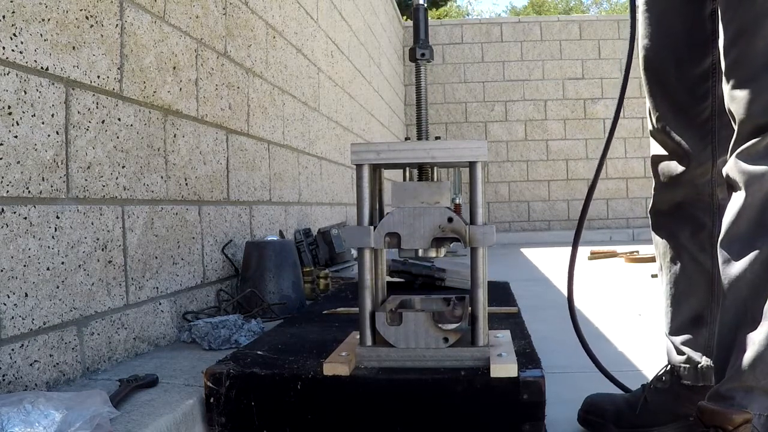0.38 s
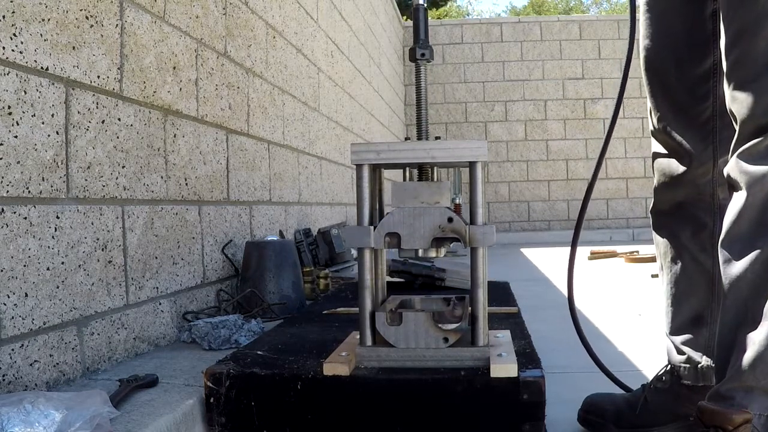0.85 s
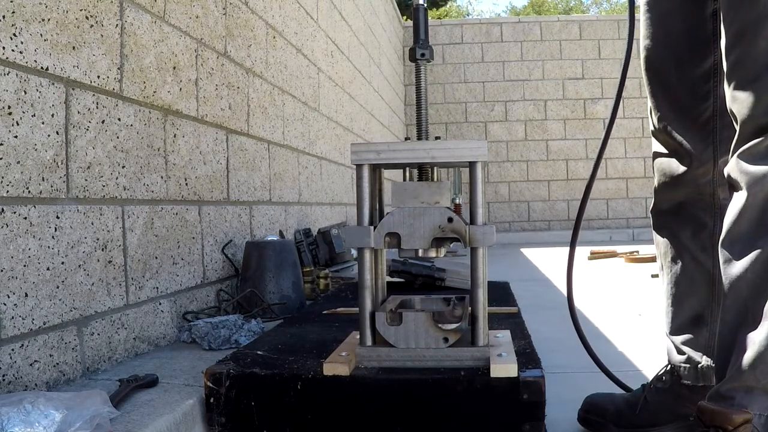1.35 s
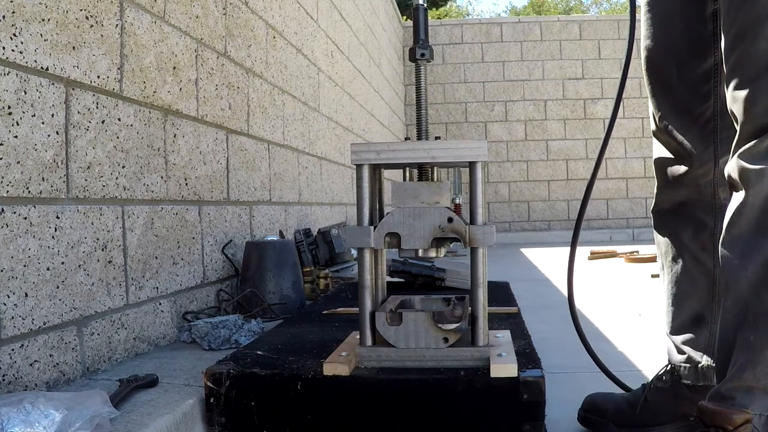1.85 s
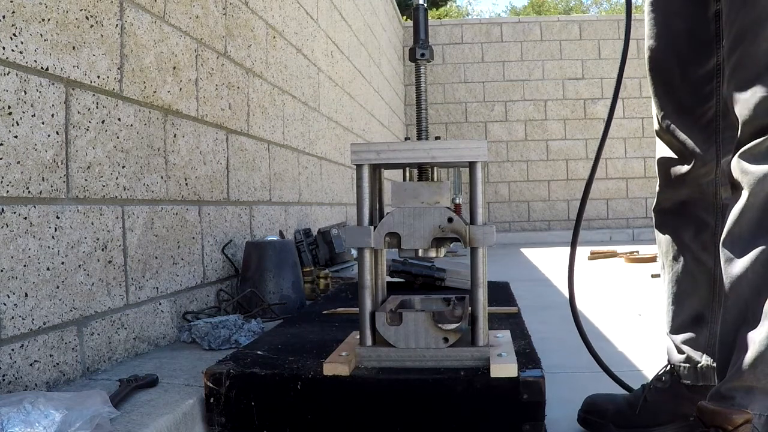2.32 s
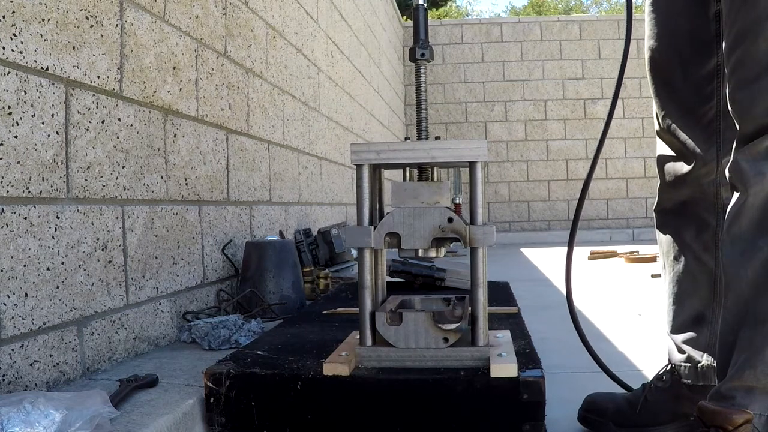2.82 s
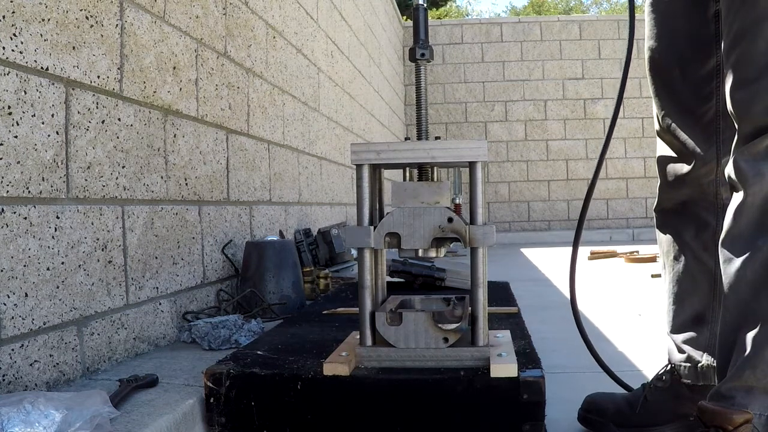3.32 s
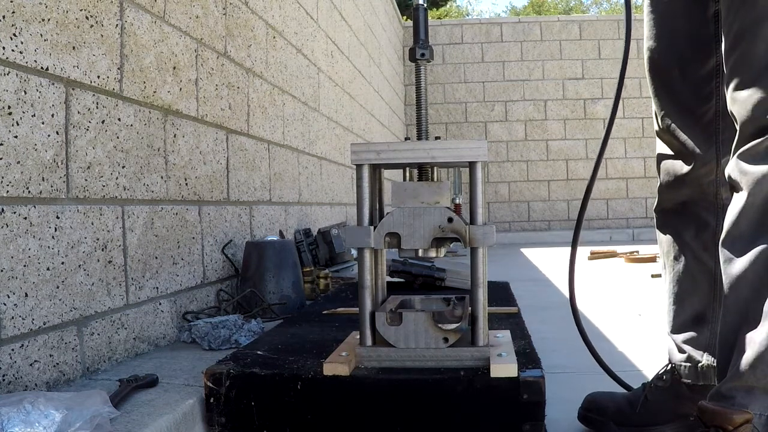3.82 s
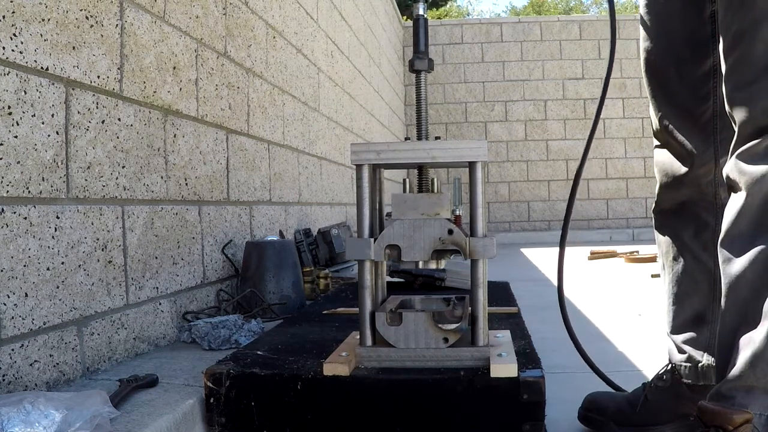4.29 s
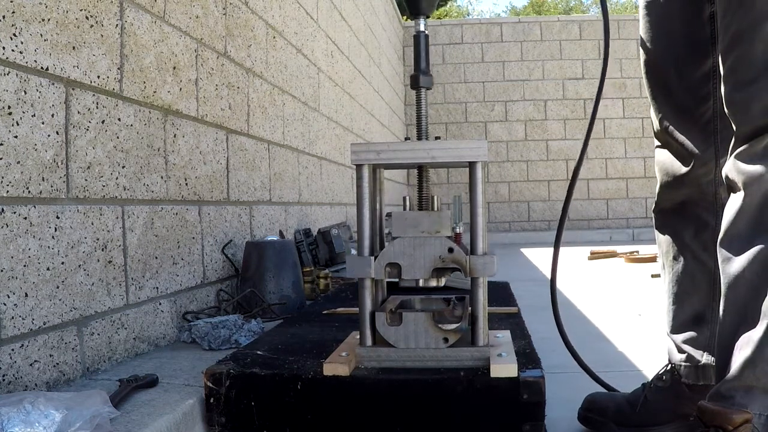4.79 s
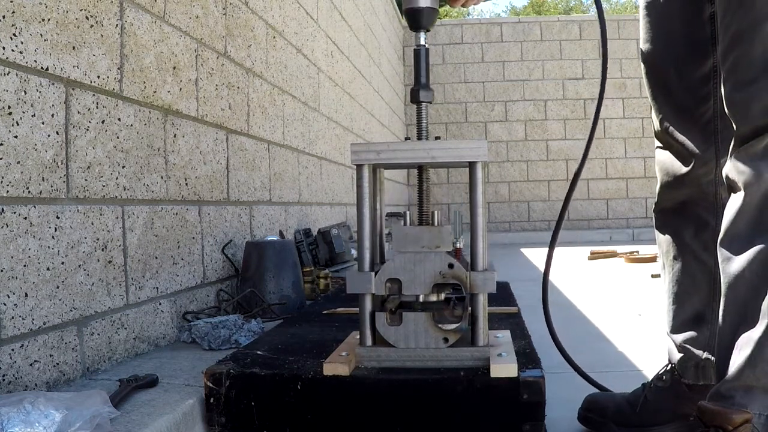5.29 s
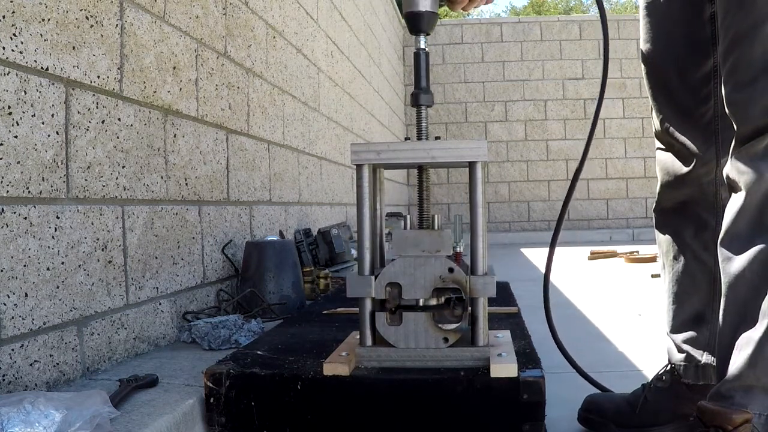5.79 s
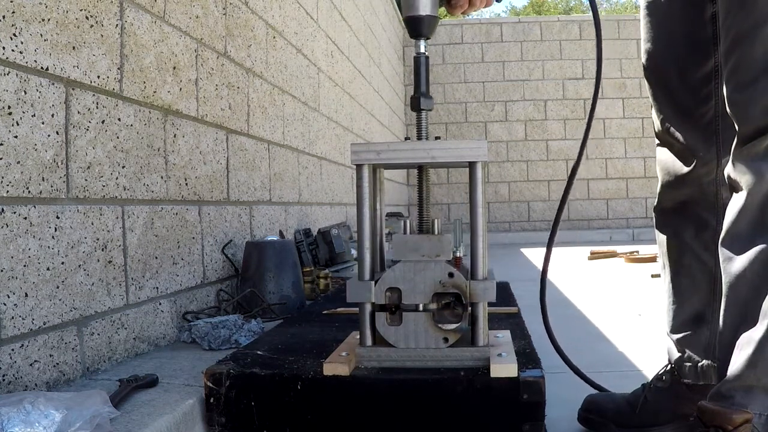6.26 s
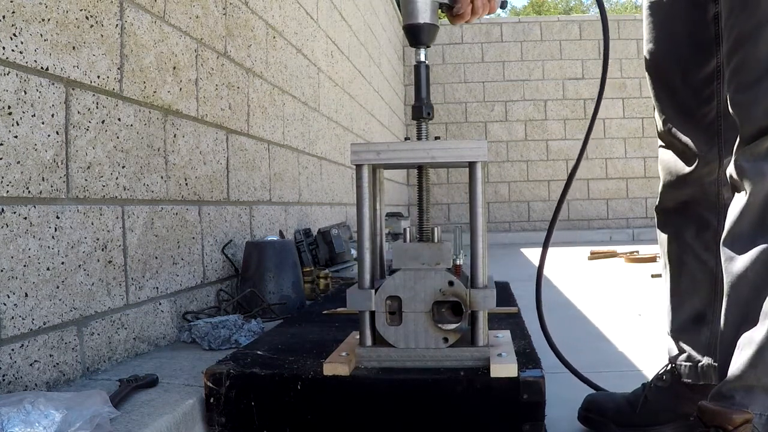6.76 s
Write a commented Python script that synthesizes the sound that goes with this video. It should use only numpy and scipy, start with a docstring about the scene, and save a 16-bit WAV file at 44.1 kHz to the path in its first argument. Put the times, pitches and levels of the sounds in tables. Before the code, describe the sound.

An air impact wrench hammers loudly in a walled yard, pauses over faint hiss and ticks, then rattles one long burst and three short ones.

```python
"""Walled yard, microphone close to a steel press whose screw is driven by an air impact wrench.
First a thump, as the sound begins abruptly mid-burst: hiss, hammer on anvil 20-30 times a second, rumbling stand.
Then the hose refills, the socket ticks, a bird whistles, a joint squeaks and a far engine gathers speed.
A long burst and three short ones follow, the hose refilling again; the dies meet near the end.
Struck steel is ringing modes, air and rumble are coloured noise, engine and bird are gliding sines."""
import sys
import numpy as np
from scipy import signal
from scipy.io import wavfile

SR = 44100
rng = np.random.default_rng(int(sys.argv[2]) if len(sys.argv) > 2 else 0)


def int16_out(signal):
    """Quantize to a 16-bit WAV file."""
    q = np.round(np.clip(np.atleast_2d(signal).T, -1, 1) * 32767)
    wavfile.write(sys.argv[1], SR, q.astype(np.int16))


def makeup_ratio(level_db):
    """Linear amplitude ratio for a level in decibels (20 dB per factor of ten)."""
    decades = np.asarray(level_db, float) / 20
    return 10 ** decades


N = 303408


def rms_one(x):
    """Scales a signal to rms 1."""
    return x / np.sqrt(np.mean(x ** 2) + 1e-20)


def in_time(rows):
    """Columns of a table, joined by straight lines and read at every sample."""
    s, *columns = np.transpose(rows)
    return [np.interp(np.arange(N) / SR, s, column) for column in columns]


def band(x, low_hz, high_hz):
    """Passes what lies between two frequencies."""
    return signal.sosfilt(signal.butter(2, [low_hz, high_hz], "band", fs=SR, output="sos"), x)


def drift(rate):
    """Slow random wander of rms 1; rate is its corner in Hz."""
    r = np.exp(-80 * np.pi * rate / SR)  # drawn at every 40th sample
    white = rng.standard_normal(N // 40 + 2002)
    slow = signal.lfilter([1], [1, -2 * r, r * r], white)[2000:]  # past the filter's start
    return np.interp(np.arange(N) / 40, np.arange(len(slow)), rms_one(slow))


def noise(spectrum, patchy_db, rate):
    """Half-octave bands of noise, flickering partly together and partly alone; rms 1."""
    hz, db = np.transpose(spectrum)
    out, together, white = 0, drift(rate), rng.standard_normal((2, N))
    edges = 20 * 2 ** np.arange(0, 10.1, .5)
    for k, (low, high) in enumerate(zip(edges, np.minimum(edges[1:], .45 * SR))):
        if hz[0] / 1.5 < low < hz[-1]:
            level_db = np.interp(np.log(low * high) / 2, np.log(hz), db)
            gain = makeup_ratio(level_db + patchy_db * (together + drift(rate)))
            out = out + gain * band(white[k % 2], low, high)
    return rms_one(out)


def ring(clicks, hz, t60):
    """A damped resonance: a unit click sets a sine of height 1 ringing."""
    r, w = makeup_ratio(-60 / (t60 * SR)), 2 * np.pi * hz / SR
    return signal.lfilter([0, np.sin(w)], [1, -2 * r * np.cos(w), r * r], clicks + 1e-18)


# trigger pulls: on t/s, off t/s, air level/dB, shaking level/dB, ringing level/dB, treble tilt/dB per octave
PULLS = [(-.1, 0.303, -24, -21, -16, 1), (3.93, 5.407, -23, -21, -23, 2),
         (5.729, 5.889, -24, -18.5, -30, 1.5), (6.142, 6.34, -22.5, -22, -40, 1.5),
         (6.55, 6.724, -24, -19, -26, 1.5)]


def per_pull(column, start, stop):
    """Gain of the trigger pulls: each one's level, shaped by the start and stop curves."""
    t, out = np.arange(N) / SR, 0
    for row in PULLS:
        starting = np.interp(t - row[0], *np.transpose(start))
        stopping = np.interp(t - row[1], *np.transpose(stop))
        out = out + makeup_ratio(row[column] + starting + stopping)
    return out


# hammer on anvil: t/s, relative peak level/dB
BLOWS = [(.0034, -7), (0.0439, -4.5), (.0912, -7.5), (0.1375, -7), (0.1882, -6.5), (0.2384, -7),
         (0.2841, -8), (3.9473, -8.5), (3.97, -3.5), (3.9954, -5.5), (4.014, -5.5), (4.0377, -2),
         (4.06, -9), (4.0791, -1.5), (4.0918, -9), (4.1148, -6.5), (4.151, -6), (4.1803, -13),
         (4.2025, -3.5), (4.241, -3.5), (4.2607, -11), (4.2899, -9), (4.3255, -6), (4.3673, -5),
         (4.388, -13), (4.4104, -10), (4.4494, -6), (4.4865, -3.5), (4.528, -5.5), (4.5487, -8),
         (4.594, -6.5), (4.6212, -4), (4.667, -2), (4.7118, -3.5), (4.7546, -3), (4.774, -5.5),
         (4.7976, -4.5), (4.838, -2.5), (4.8826, -4), (4.9165, -5.5), (4.9608, -2), (5.0003, -2),
         (5.0389, -6), (5.0555, -10), (5.1113, -7), (5.1418, -5), (5.1934, -3.5), (5.221, -4), (5.2596, -6),
         (5.2959, -4.5), (5.3413, -4.5), (5.3655, -7.5), (5.4084, -14), (5.773, -2), (5.79, -6.5),
         (5.8107, -6), (5.8256, -2), (5.8576, -2), (5.876, -15), (5.912, -6), (5.9225, -13), (6.1685, -7),
         (6.2012, -2), (6.2498, 1), (6.286, -3), (6.5787, -10), (6.5897, -5), (6.616, -5.5), (6.6318, -1.5),
         (6.675, -1), (6.718, -2), (6.731, -15), (6.7748, -13.5)]


def blows():
    """Tilt and ringing of each hammer blow follow from its place in the pull."""
    fresh_tilt_db, fresh_s = 7, .05   # the first blows of a pull are brighter
    free_ring_db, free_s = 5.5, 0.026   # the last ones, off load, ring more
    s, peak_db = np.transpose(BLOWS)
    pull = np.searchsorted([row[0] for row in PULLS], s) - 1
    on, off, _, _, ring_db, tilt_db = np.array(PULLS)[pull].T
    chance = rng.standard_normal((len(s), 2))
    tilt_db = tilt_db + fresh_tilt_db * np.exp((on - s) / fresh_s) + 0.44 * chance[:, 0]
    ring_db = ring_db + free_ring_db * np.exp(np.minimum(s - off, 0) / free_s) + 3.3 * chance[:, 1]
    return np.transpose([s, peak_db, tilt_db, ring_db])


# modes of press frame and wrench body: f/Hz, relative level/dB, t60 t/s before the ring share is applied
STEEL = [(680, -3, 0.021), (848, -21, 0.18), (908, -34, 0.053), (1426, 1, 0.041), (1750, -22, 0.053),
         (2093, -5, 0.02), (2387, -11, 0.15), (2560, -3.5, 0.11), (3080, -5, 0.059), (3320, -2, 0.017),
         (3620, 9.5, 0.017), (4186, 3, 0.028), (4707, 1.5, 0.036), (4874, -17, .05), (5376, 2, 0.03),
         (5760, 1, 0.082), (6660, -9, 0.013), (7540, -13, 0.12), (8380, -2.5, 0.021), (8736, -2.5, 0.044),
         (9750, -24.5, .03), (11000, -9, 0.024), (12600, -22, 0.036)]
# noise of a crack: f/Hz, level/dB per Hz
CRACK = [(290, -32), (500, -12.5), (988, -10.5), (1400, -5.5), (2500, 6), (8330, -6), (14700, -13.5),
         (16000, -38.5)]


def steel(events, crack_db, crack_t60, rise_s, spread_db, ring_share, rattle):
    """Each contact cracks, and strikes every mode with a strength of its own."""
    s, peak_db, tilt_db, ring_db = np.transpose(events)
    at, out = np.maximum(np.round(s * SR).astype(int), 0), np.zeros(N)
    chance = rng.standard_normal((len(at), len(STEEL)))
    dealt = rng.integers(0, 4, N)
    for k, (hz, level_db, t60) in enumerate(STEEL):
        clicks = rattle * makeup_ratio(level_db) * (dealt == k % 4)   # a rattle touch reaches one mode in four
        tilted_db = peak_db + tilt_db * np.log2(hz / 4000)
        clicks[at] += makeup_ratio(tilted_db + level_db + ring_db + spread_db * chance[:, k])
        out += ring(clicks, hz, t60 * ring_share)
    crack, slow = noise(CRACK, patchy_db=0.53, rate=110), np.exp(-1 / (rise_s * SR))
    # the shock also passes through the steel
    through = sum(makeup_ratio(db) * rms_one(ring(crack, hz, t60 * .5)) for hz, db, t60 in STEEL)
    crack = rms_one(crack + makeup_ratio(-2.5) * rms_one(through))
    for part, sign in ((band(crack, 300, 4000), -1), (band(crack, 4000, 17000), 1)):
        kicks = np.zeros(N)
        kicks[at] = makeup_ratio(peak_db + sign * tilt_db + crack_db)
        dying = signal.lfilter([1], [1, -makeup_ratio(-60 / (crack_t60 * SR))], kicks + 1e-18)
        out += part * signal.lfilter([1 - slow], [1, -slow], dying)   # the shock needs a moment to spread
    return out


# exhaust air: f/Hz, level/dB per Hz
EXHAUST = [(180, -28), (300, -5), (392, -14.5), (614, -5.5), (978, -10), (1410, 0.5), (1560, -10),
           (2480, -1.5), (8360, -6), (14700, -15.5), (16000, -22)]
# the valve opens on a full hose, whose pressure then sags: t/s after on, level/dB
AIR_OPENS = [(0, -76), (.007, -16), (.024, -5), (.045, 1), (.12, 1.5), (.22, -1)]
# the valve closes and the motor empties: t/s after off, level/dB
AIR_CLOSES = [(-.05, 0.5), (0, -3), (.014, -27.5), (.06, -32), (.12, -36.5), (.2, -75)]


def wrench(hits):
    """Blows, random chatter of the loose socket that follows the air, and exhaust hiss."""
    air = per_pull(column=2, start=AIR_OPENS, stop=AIR_CLOSES)
    sizes = makeup_ratio(4.1 * np.minimum(rng.exponential(1, N), 4)) * rng.choice([-1, 1], N)
    touches = rng.random(N) < 1500 * makeup_ratio(2.5 * drift(50)) / SR   # some 1500 a second
    chatter = makeup_ratio(-16.5) * air * sizes * touches
    metal = steel(hits, crack_db=-4.0, crack_t60=0.072, rise_s=0.00042, spread_db=5.5,
                  ring_share=0.44, rattle=chatter)
    hiss = makeup_ratio(1.5) * air * noise(EXHAUST, patchy_db=1.65, rate=81)
    return metal + hiss


# the frame's long modes: f/Hz, t60 t/s when free, relative level/dB under a blow
FRAME = [(872, .42, -17), (974, 0.17, -21.5), (1432, 0.42, 0), (2500, 0.19, -2.5), (3350, .2, -1.5),
         (8100, 0.33, -11)]
# the frame rings free as the load lets go: t/s, then level/dB of each long mode
LET_GO = [(.29, -38, -48, -38, -37, -51, -52.5), (5.415, -32, -34, -51, -50, -54, -58),
          (5.916, -45, -36, -35.5, -43, -48, -47), (6.328, -56, -34.5, -39.5, -44.5, -53, -44),
          (6.741, -34, -47, -46, -48, -34, -44)]


def frame(hits):
    """Damped rings under each blow, long ones that outlast each burst; they flutter as the frame rocks."""
    loaded_t60_share, shock_lag_s = 0.26, .004   # the load damps them; a blow reaches them down the screw
    s, *levels_db = np.transpose(LET_GO)
    free_at = np.round(s * SR).astype(int)
    struck_at = np.round((hits[:, 0] + shock_lag_s) * SR).astype(int)
    chance, out = rng.standard_normal((len(hits), len(FRAME))), np.zeros(N)
    for k, (hz, t60, struck_db) in enumerate(FRAME):
        free, loaded = np.zeros((2, N))
        free[free_at] = makeup_ratio(levels_db[k])
        blow_db = hits[:, 1] + hits[:, 3] + struck_db + 2.5 * chance[:, k]
        loaded[struck_at] = makeup_ratio(blow_db) * (-1) ** k
        rings = ring(free, hz, t60) + ring(loaded, hz, t60 * loaded_t60_share)
        out += rings * makeup_ratio(2.5 * drift(15))
    return out


# rumble of the stand: f/Hz, level/dB per Hz
RUMBLE = [(12, -34), (20, -5.5), (49, -1.5), (123, -7.5), (157, -4.5), (242, -23.5), (296, -9),
          (387, -44.5), (500, -18), (650, -56.5), (1100, -120)]
# the stand takes longer than the air to start: t/s after on, level/dB
STAND_STARTS = [(0, -84.5), (.012, -41), (.045, -8.5), (.07, 1.5)]
# and longer to come to rest: t/s after off, level/dB
STAND_RESTS = [(0, 2), (.04, -5.5), (.11, -13.5), (.16, -12.5), (.22, -33), (.3, -80.5)]
# a thump as the sound begins abruptly mid-burst (first row), then the stand lurches: t/s, relative level/dB
THUMPS = [(.004, -10.5), (3.999, -13.5), (4.12, -10), (4.303, -15), (4.642, -18), (4.815, -11),
          (5.092, -12.5), (5.173, -15), (5.263, -9), (5.409, -13), (5.867, -6), (5.932, -12.5),
          (6.215, -14), (6.3, -13.5), (6.735, -10.5), (6.78, -16)]


def stand():
    """Low noise of the shaken stand: steady under each pull, swelling at the opening thump and each lurch."""
    t, thump_s = np.arange(N) / SR, 0.018
    thumping = sum(makeup_ratio(db) * np.exp(-((t - s) / thump_s) ** 2) for s, db in THUMPS)
    shaking = np.hypot(per_pull(column=3, start=STAND_STARTS, stop=STAND_RESTS), thumping)
    return makeup_ratio(-2.08) * shaking * noise(RUMBLE, patchy_db=1.0, rate=20)


# modes of the closed mould: f/Hz, relative level/dB, t60 t/s
MOULD = [(306.6, -18, 0.086), (195, -16, .08), (360, -14.5, 0.062), (426, -17, 0.089),
         (679.4, -18.5, 0.052), (968, -28, .1), (1143, -18, 0.04), (1304, -17.5, 0.036),
         (1600, -17.5, 0.058), (1748, -14, 0.055), (2315, -23, 0.058), (4900, -23.5, 0.19),
         (5900, -30, .06)]


def dies():
    """The dies meet: a quick run of contacts strikes the mould's modes, each with a strength of its own."""
    meet_s, spread_db = 6.732, 3.0
    late_s, peak_db = np.transpose([(0, -4.5), (.0035, -6), (.007, -5.5), (.011, -6), (.017, -13.5)])
    at = np.round((meet_s + late_s) * SR).astype(int)
    chance, out = rng.standard_normal((len(late_s), len(MOULD))), np.zeros(N)
    for k, (hz, db, t60) in enumerate(MOULD):
        clicks = np.zeros(N)
        clicks[at] = makeup_ratio(peak_db + spread_db * chance[:, k])
        out += makeup_ratio(db + 2.5 * drift(40)) * ring(clicks, hz, t60)
    return out


# socket and screw settling: t/s, relative peak level/dB, treble tilt/dB per octave, ringing level/dB
TICKS = [(0.397, -31.5, 3, -22.5), (1.0226, -57, -8, -28), (2.2787, -52.5, -3, -26),
         (2.3461, -41, -0.5, -13.5), (2.355, -42, 0.0, -23), (2.4488, -36, 2, -22),
         (2.4867, -29.5, -2, -24), (2.5024, -38, -3.5, -13.5), (3.3398, -10.5, 1, -20.5),
         (6.7924, -28.5, 4, -28)]


def ticks():
    """Socket and screw tick as they settle: single contacts of steel, without rattle."""
    return steel(TICKS, crack_db=-2.5, crack_t60=0.024, rise_s=0.00093, spread_db=2.0,
                 ring_share=0.54, rattle=np.zeros(N))


# air refilling the hose: t/s, level/dB
REFILL = [(0, -60.5), (.4, -62), (.9, -63.5), (1.05, -67.5), (1.15, -71), (1.3, -110), (5.3, -110),
          (5.4, -61), (6.88, -59)]
# its colour: f/Hz, level/dB per Hz
REFILL_COLOUR = [(880, -29.5), (1500, 0.5), (2550, 2), (3040, 2.5), (4080, -0.5), (4930, 3.5),
                 (6530, -17.5), (8000, -17.5), (10400, -49), (17600, -120)]


def hose():
    """Air refills the hose: coloured noise, and a noise-driven resonance as it sings in the coupling."""
    whistle = makeup_ratio(-7) * rms_one(ring(rng.standard_normal(N), hz=5000, t60=.012))
    return makeup_ratio(in_time(REFILL)[0]) * (noise(REFILL_COLOUR, patchy_db=.5, rate=18) + whistle)


# faint squeaks of a joint: t/s, low tone level/dB, high tone level/dB, length t/s
SQUEAKS = [(1.804, -60.5, -64.5, 0.028), (2.159, -65, -65, 0.04), (2.533, -76, -70, .025),
           (2.59, -66.5, -69.5, .02), (2.642, -69, -69, 0.022), (3.238, -68, -90, 0.046)]
# the low and the high tone: f/Hz
SQUEAK_HZ = (3040, 4400)


def squeaks():
    """A joint squeaks: two noise-driven, wavering tones under a short swell."""
    t, out = np.arange(N) / SR, 0
    for k, hz in enumerate(SQUEAK_HZ):
        swell = 0
        for row in SQUEAKS:
            swell = swell + makeup_ratio(row[1 + k]) * np.sin(np.pi * np.clip((t - row[0]) / row[3], 0, 1))
        out = out + swell * rms_one(ring(rng.standard_normal(N), hz, t60=0.013))
    return out


# one clear echo from each facing wall: delay t/s, level/dB
WALLS = [(0.034, -28.5), (0.096, -35.5)]


def slapback(x):
    """Delays the near sound once for each facing wall."""
    return sum(makeup_ratio(db) * np.pad(x, (round(s * SR), 0))[:N] for s, db in WALLS)


def yard(x):
    """Echoes between block walls: feedback delays, duller on every round."""
    t60_s, wall_cut_hz = 0.58, 3420   # t60 before the dulling
    out, dull = np.zeros(N), np.exp(-2 * np.pi * wall_cut_hz / SR)
    for k, lag in enumerate((np.geomspace(.017, .047, 9) * SR).astype(int)):
        loop, gain, state = x.copy(), makeup_ratio(-60 * lag / SR / t60_s), [0.]
        for i in range(lag, N, lag):
            back, state = signal.lfilter([gain * (1 - dull)], [1, -dull], loop[i - lag:i], zi=state)
            loop[i:i + lag] += back[:N - i]
        out += (loop - x) * (-1) ** k
    return out


def tones(table, first):
    """Every second multiple of a gliding base pitch, each wavering in level."""
    hz, *levels_db = in_time(table)
    turn = 2 * np.pi * np.cumsum(hz * (1 + 0.0037 * drift(1.9))) / SR
    out = 0
    for k, db in enumerate(levels_db):
        out = out + np.sqrt(2) * makeup_ratio(db + 1.5 * drift(5)) * np.sin((first + 2 * k) * turn + k)
    return out


# far engine: t/s, firing f/Hz, rms level/dB of multiples 2, 4, 6
ENGINE = [(.5, 30.11, -57.5, -52.5, -54.5), (1.0, 33.34, -47.5, -65, -79.5), (1.5, 35.88, -44.5, -56, -71),
          (1.64, 34.91, -34, -49.5, -68), (1.98, 36.42, -31.5, -52, -72.5), (2.62, 40.92, -41.5, -54, -55),
          (2.76, 40.61, -29, -45.5, -64), (2.9, 41.77, -46, -46.5, -67), (3.4, 41.93, -38.5, -44, -51.5),
          (3.84, 42.48, -40, -36, -56), (5.6, 42.54, -37, -50, -66.5), (6.05, 43.44, -38.5, -43, -60),
          (6.35, 43.5, -38, -54, -67), (6.5, 43.18, -55, -41, -61)]
# a second set of its tones, slightly sharp: t/s, base f/Hz, rms level/dB of multiples 3, 5, 7
DRONE = [(1.1, 37.15, -47.5, -66.5, -72), (1.9, 37.3, -51, -64, -65), (2.2, 39.48, -41.5, -61, -67),
         (2.484, 42.42, -49, -61, -56.5), (2.8, 43.58, -32.5, -60, -66), (2.91, 43.5, -47.5, -51, -66),
         (3.076, 43.65, -32.5, -59.5, -63), (3.36, 44.56, -40.5, -54.5, -59),
         (3.44, 43.28, -50.5, -61, -59), (3.9, 44.86, -42, -53, -63), (5.6, 44.82, -50, -68, -62),
         (6.5, 44.52, -54, -53, -54.5)]


def engine():
    """Two sets of gliding tones over a wavering hum."""
    hum_hz, hum_db = 47.3, -41.5   # both wander about these
    hum_turn = 2 * np.pi * np.cumsum(hum_hz * (1 + 0.01 * drift(3.9))) / SR
    hum = makeup_ratio(hum_db + 5.1 * drift(3.6)) * np.sin(hum_turn)
    fade_in = np.clip((np.arange(N) / SR - .8) / .3, 0, 1)
    return tones(ENGINE, first=2) + fade_in * tones(DRONE, first=3) + hum


# whistles: t/s, length t/s, from f/Hz, to f/Hz, level/dB
BIRD = [(1.25, .03, 2950, 3780, -64), (1.26, 0.13, 2700, 3700, -66.5)]


def bird():
    """Two rising whistles far off; each climbs fast, then levels."""
    t, out = np.arange(N) / SR, 0
    for s, length_s, from_hz, to_hz, db in BIRD:
        gone = np.clip((t - s) / length_s, 0, 1)
        hz = from_hz + (to_hz - from_hz) * np.sin(np.pi / 2 * gone) ** 0.87
        swell = makeup_ratio(db + 3.1 * drift(40)) * np.sin(np.pi * gone) ** 0.38
        out = out + swell * np.sin(2 * np.pi * np.cumsum(hz) / SR)
    return out


# roar of the town: f/Hz, level/dB per Hz
TRAFFIC = [(12, -46), (20, -23.5), (32, -6), (74, -7), (98, -12.5), (187, -24), (216, -23.5), (574, -42),
           (873, -41), (3440, -56), (4940, -55), (14300, -68), (16000, -89.5)]
# its course: t/s, approximate level/dB at 300-1200 Hz
TRAFFIC_DB = [(.55, -62), (.85, -61), (2.4, -58.5)]


def traffic():
    """Broad low roar of the town, levelled by its middle band."""
    roar = noise(TRAFFIC, patchy_db=.6, rate=5)
    return makeup_ratio(in_time(TRAFFIC_DB)[0] + 0.03) * roar / np.std(band(roar, 300, 1200))


def scene():
    """Wrench and press near the microphone, their echoes, then the stand, the hose and the distance."""
    hits = blows()
    near = wrench(hits) + ticks() + dies() + frame(hits)
    space = makeup_ratio(-25) * yard(near) + slapback(near)
    far = engine() + bird() + traffic()
    return (near + space + stand() + hose() + squeaks() + far)[None]


def band_limit(x):
    """A steep low-pass at the top of the band."""
    return signal.sosfilt(signal.butter(12, 16440, fs=SR, output="sos"), x)


def record(dry):
    """Peaks are rounded softly and the top is cut near 16 kHz."""
    rounded = 0.81 * np.tanh(dry / 0.97)
    top_cut = signal.cheby2(16, 60, 16300, fs=SR, output="sos")
    mix = signal.sosfilt(top_cut, rounded)
    return band_limit(mix)


dry = scene()
out = record(dry)
int16_out(out)
```